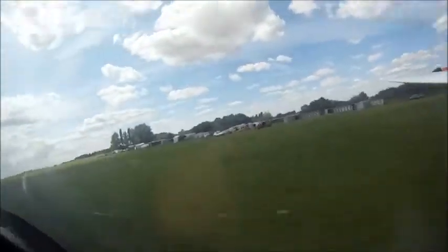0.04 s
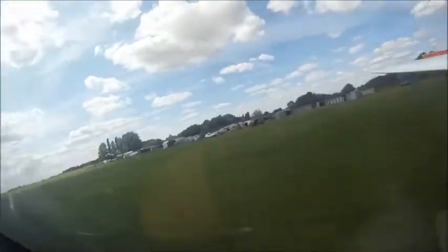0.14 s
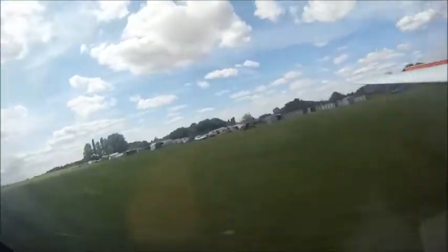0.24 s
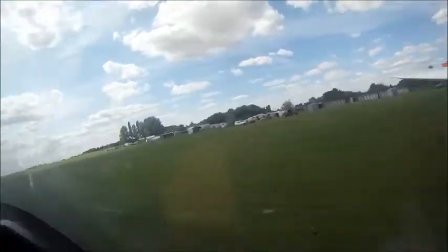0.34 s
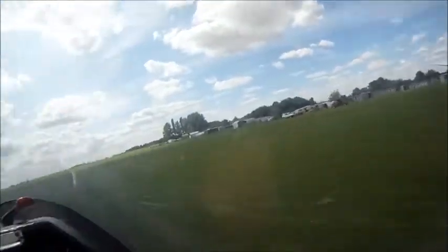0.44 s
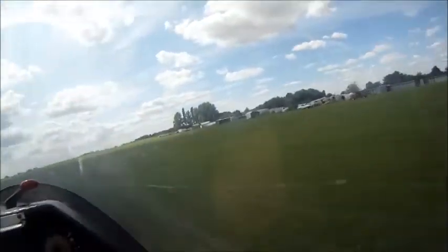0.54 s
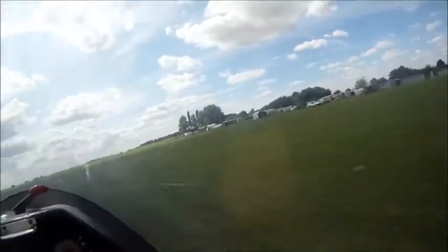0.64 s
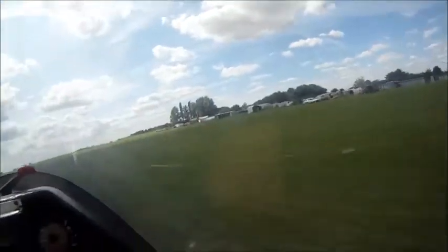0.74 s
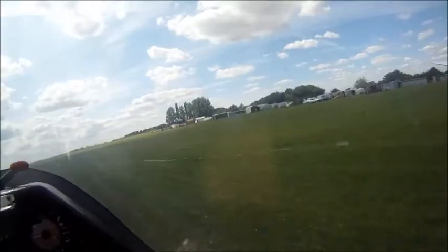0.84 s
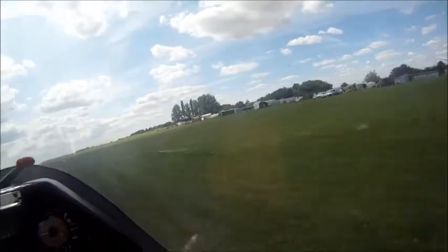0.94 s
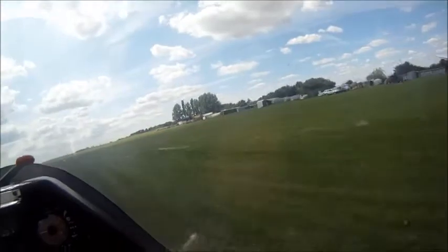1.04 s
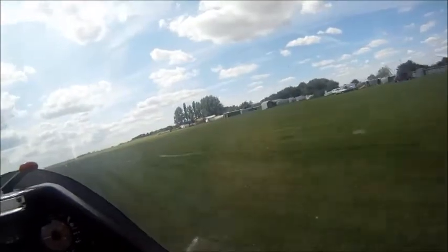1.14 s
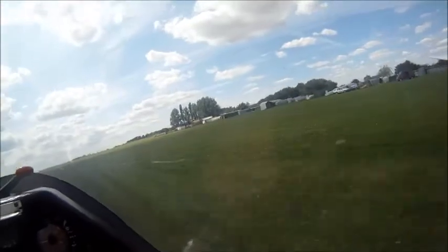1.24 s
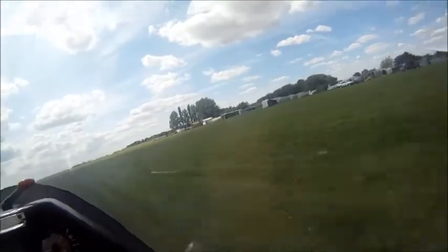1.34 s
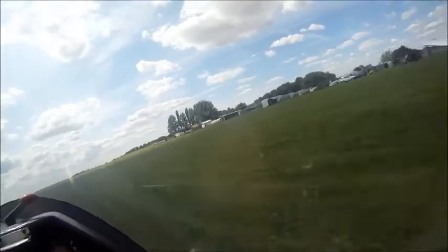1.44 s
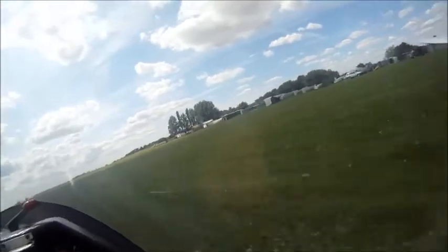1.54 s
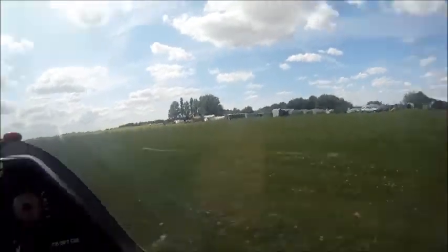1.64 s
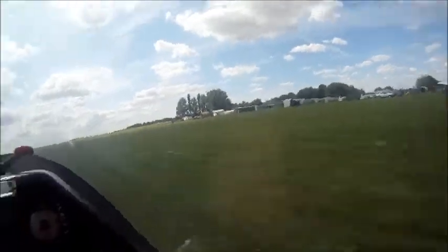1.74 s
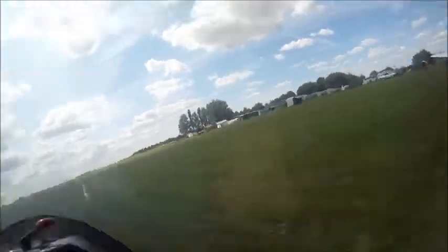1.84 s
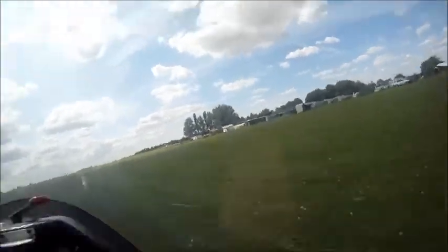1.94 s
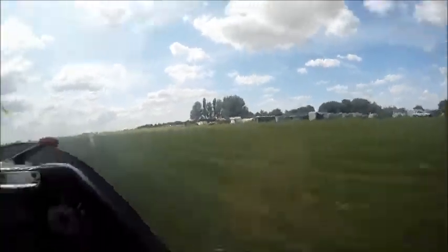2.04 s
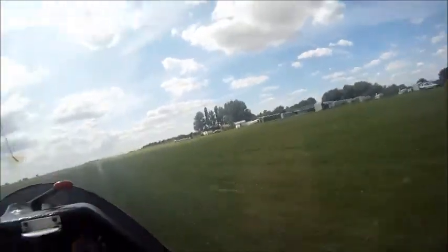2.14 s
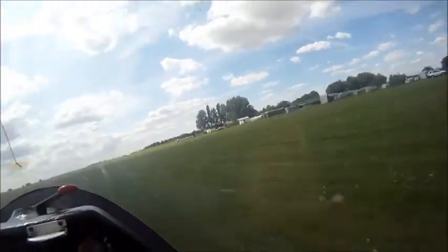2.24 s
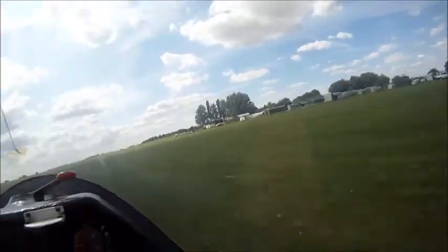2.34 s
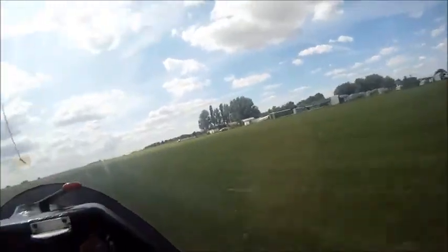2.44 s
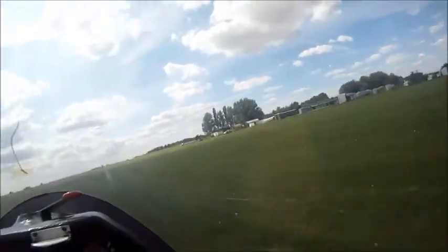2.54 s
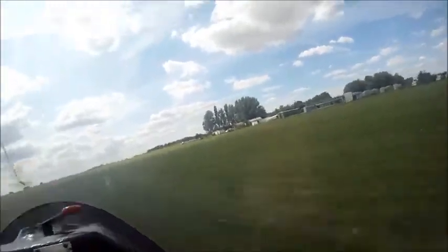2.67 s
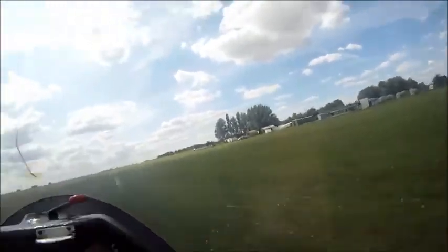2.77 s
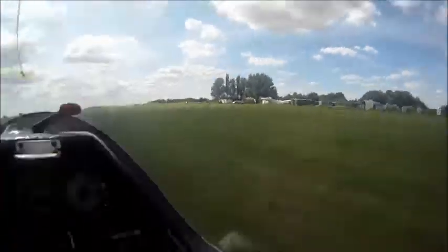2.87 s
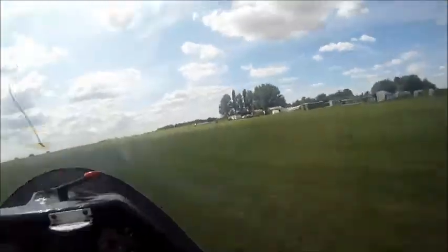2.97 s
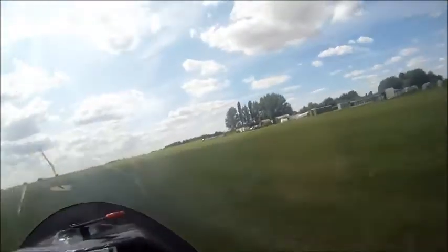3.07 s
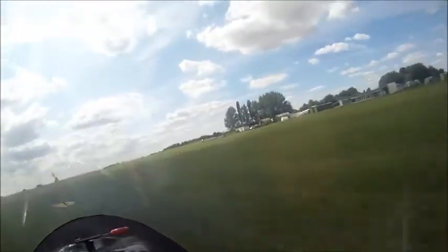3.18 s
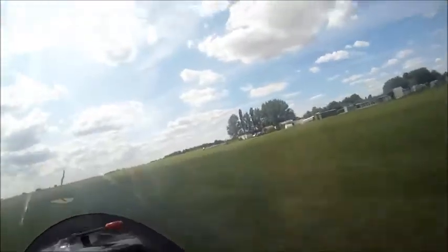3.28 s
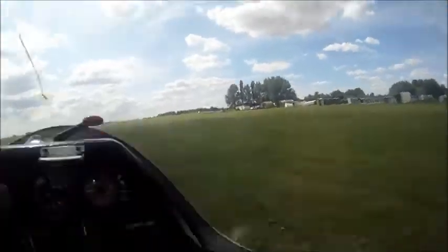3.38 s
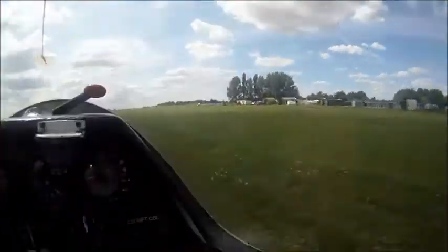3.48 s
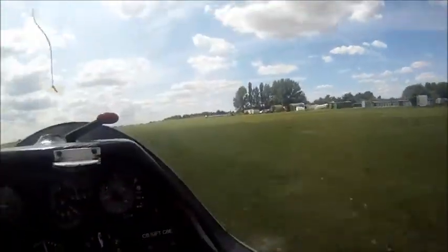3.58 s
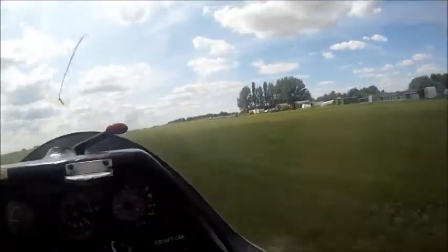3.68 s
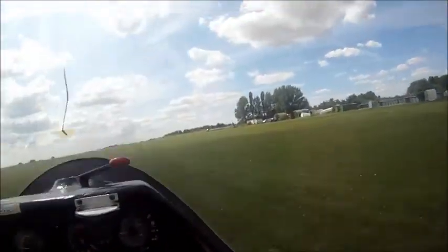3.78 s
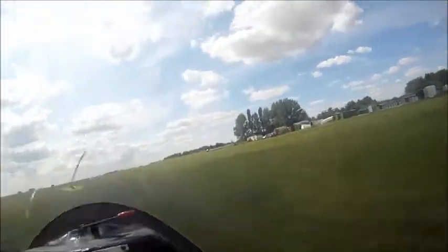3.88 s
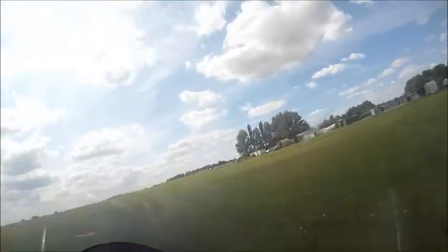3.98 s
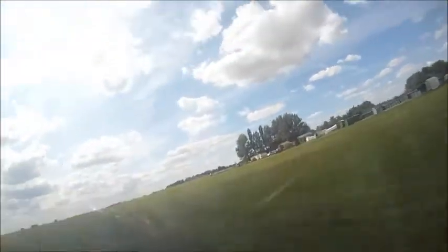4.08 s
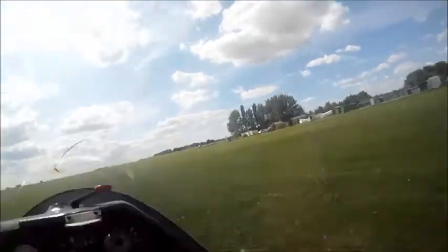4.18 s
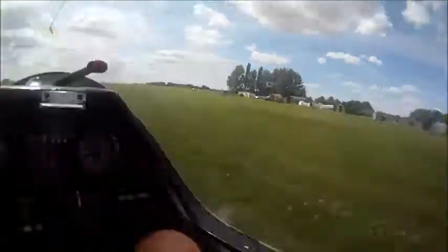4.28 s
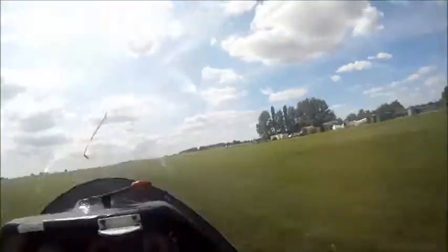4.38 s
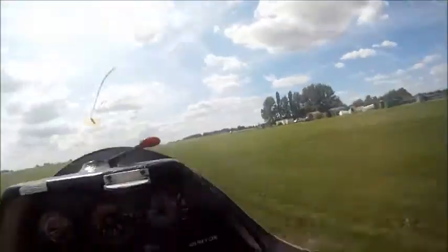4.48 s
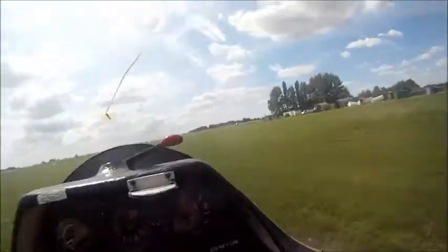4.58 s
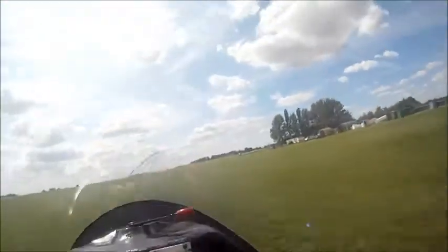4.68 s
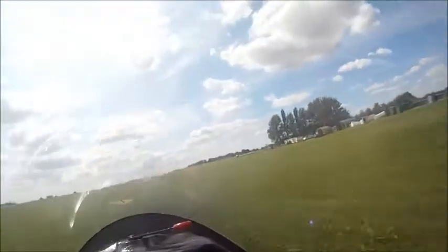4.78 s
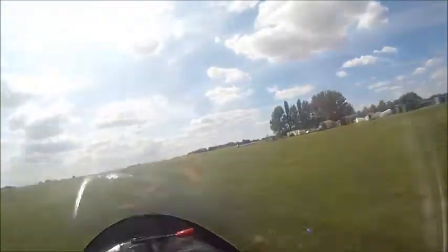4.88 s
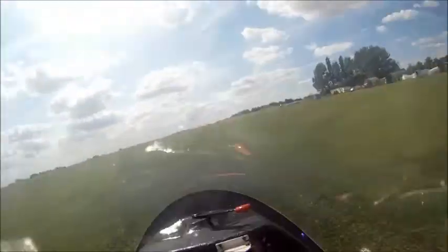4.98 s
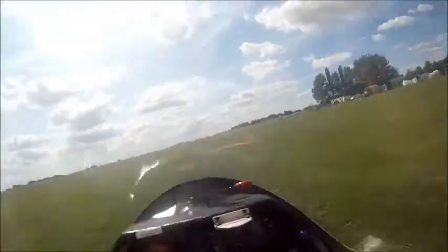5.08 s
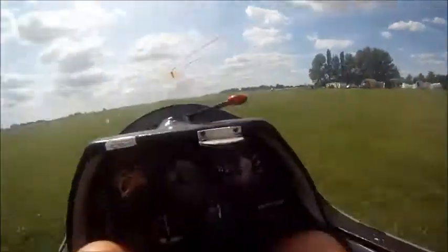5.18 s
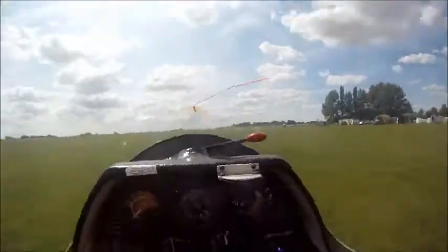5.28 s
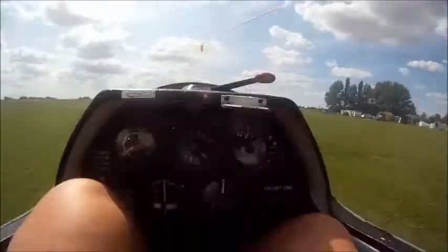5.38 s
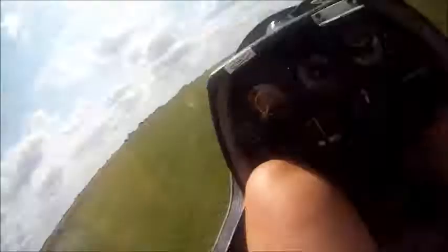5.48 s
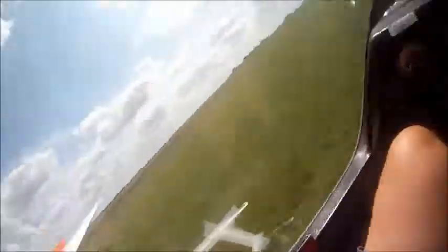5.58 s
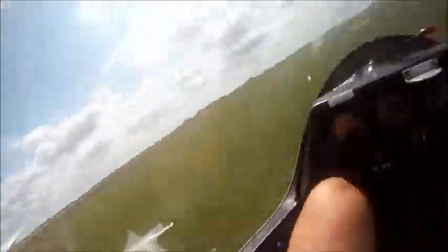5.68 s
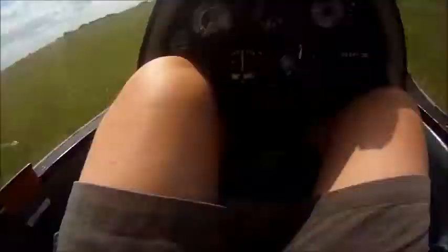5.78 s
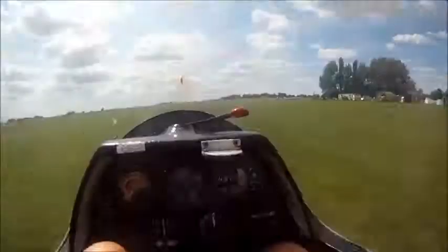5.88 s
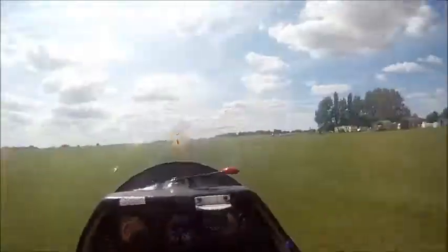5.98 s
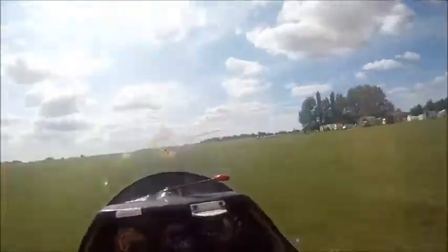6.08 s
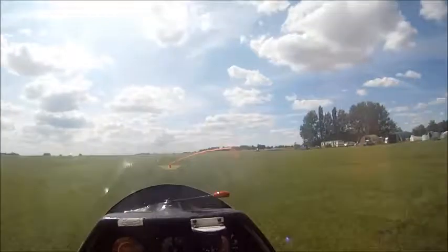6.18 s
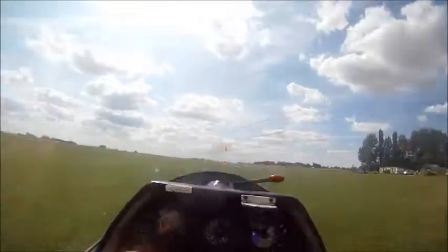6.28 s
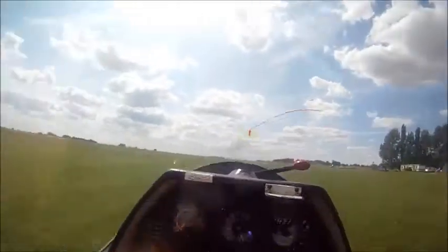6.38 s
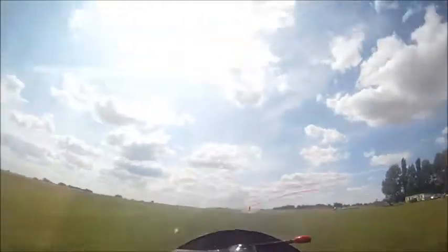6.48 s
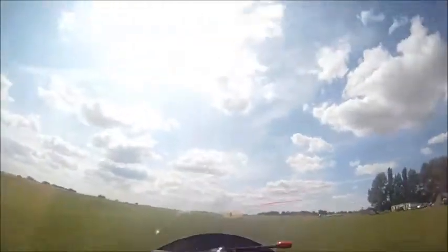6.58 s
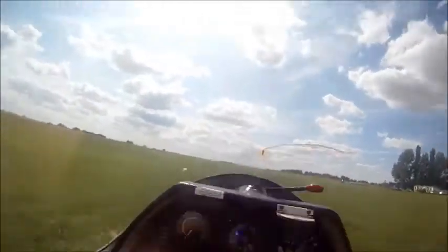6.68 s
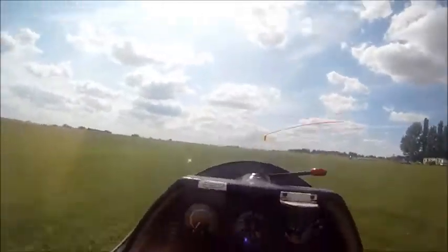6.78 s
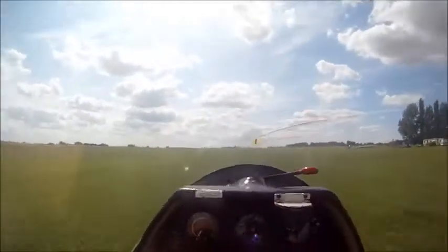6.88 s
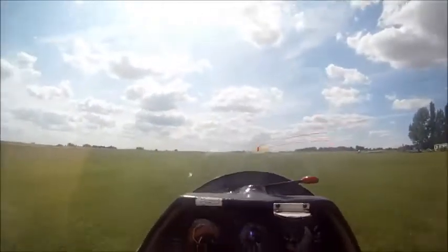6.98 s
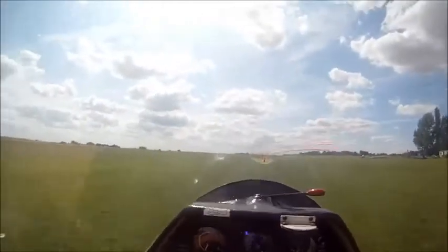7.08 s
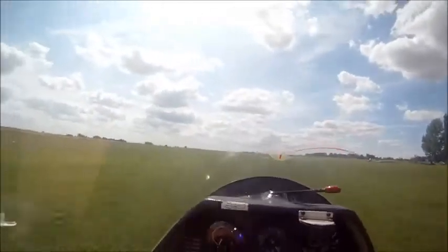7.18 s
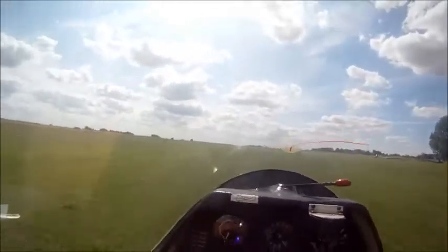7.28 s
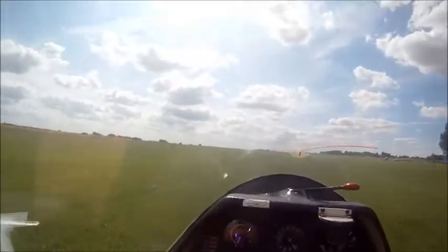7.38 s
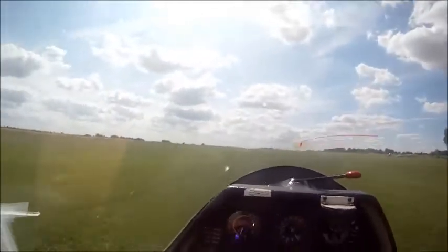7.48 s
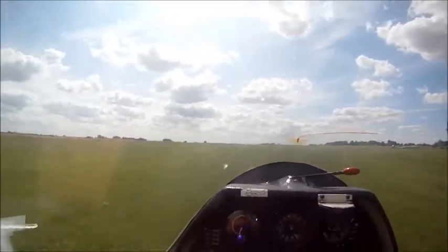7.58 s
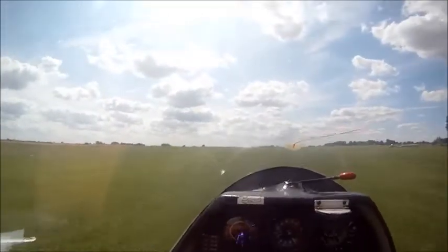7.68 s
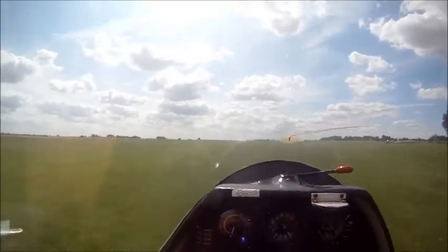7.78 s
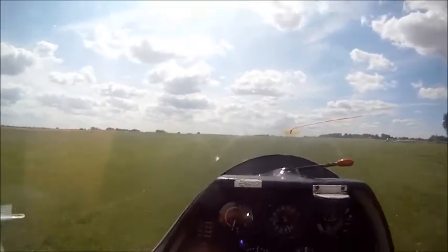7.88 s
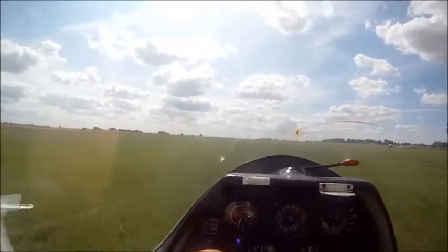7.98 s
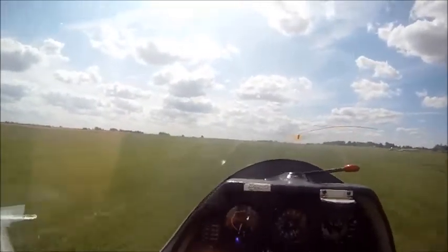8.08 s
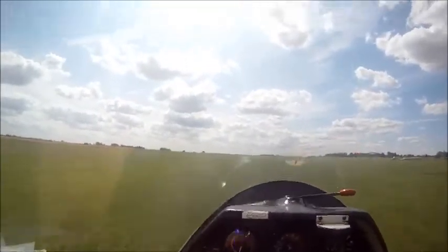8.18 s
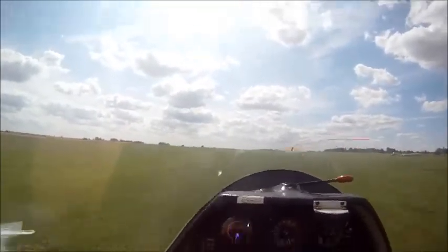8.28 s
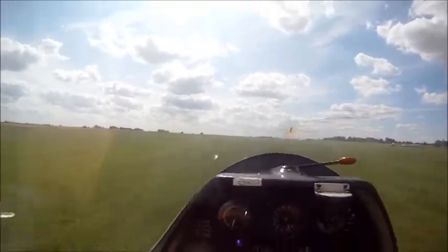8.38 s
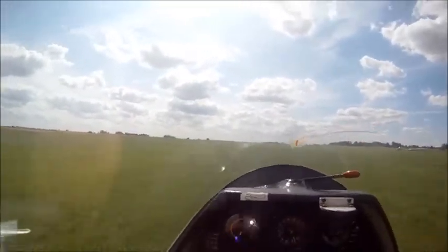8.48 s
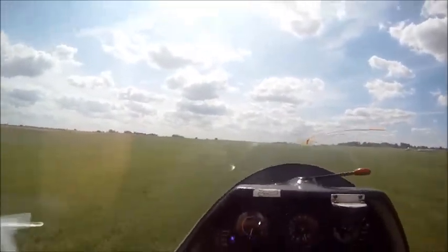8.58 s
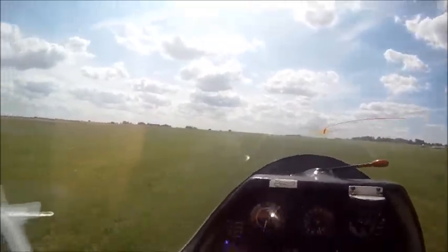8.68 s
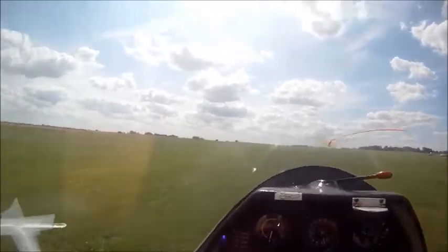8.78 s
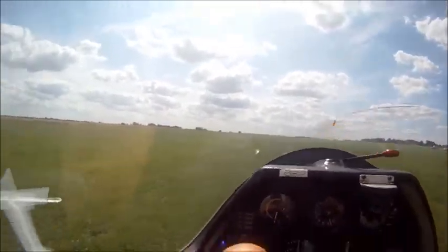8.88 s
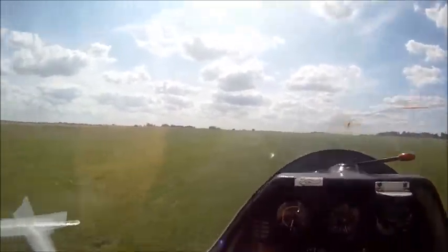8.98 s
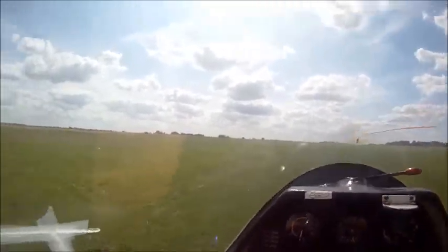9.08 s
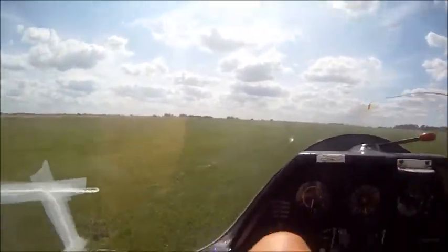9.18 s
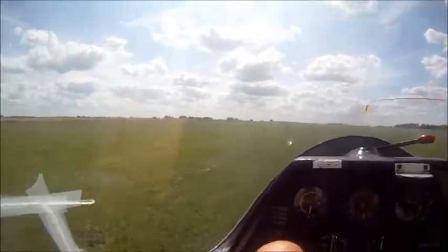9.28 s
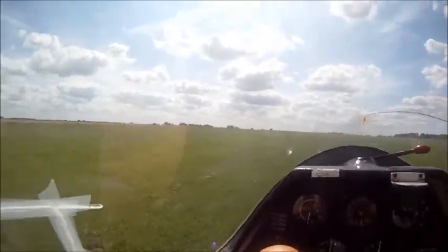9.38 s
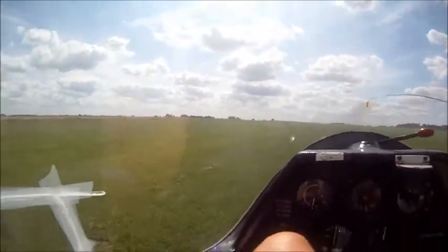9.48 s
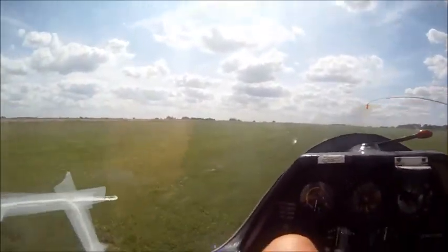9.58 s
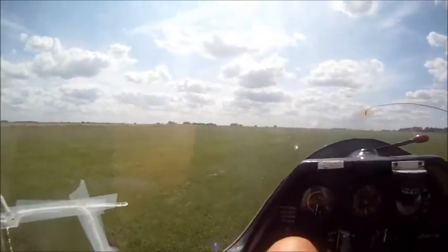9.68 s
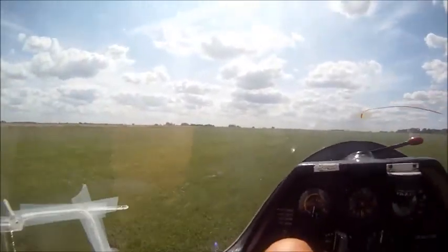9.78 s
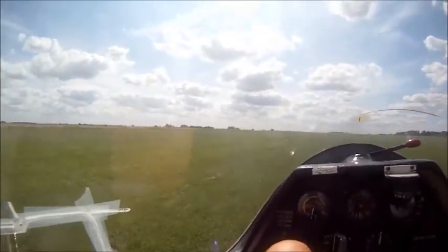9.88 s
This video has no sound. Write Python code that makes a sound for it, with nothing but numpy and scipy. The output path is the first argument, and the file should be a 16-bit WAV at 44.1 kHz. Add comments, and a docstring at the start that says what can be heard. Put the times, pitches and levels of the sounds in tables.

```python
"""A glider lands on a grass strip, heard at a small cased camera in the cockpit: first air rush, hiss and early knocks.
From 1.48 s the wheel rumbles, the fuselage booms and grass brushes the belly, with a short hop just after 5 s.
Throughout, the camera mount knocks, ticks and rattles; the hardest blows clip and briefly pull the gain down.
The air sinks until 8.5 s while ground noise fades and cockpit resonances sing out, then the rush rises again.
Air and grass are filtered noise and impulses; knocks and ticks are short sums of sines."""
import sys
import numpy as np
from scipy import signal
from scipy.fft import rfft, irfft
from scipy.io import wavfile
from scipy.ndimage import uniform_filter1d

SR = 44100
rng = np.random.default_rng(int(sys.argv[2]) if len(sys.argv) > 2 else 0)


def persist_wave(psi):
    """Save psi, clipped to +-1, as 16-bit WAV."""
    counts = np.round(np.clip(psi, -1, 1) * 32767).astype(np.int16)
    wavfile.write(sys.argv[1], SR, np.atleast_2d(counts).T)


N = 437912
TIME_S = np.arange(N) / SR
BLOW_S = TIME_S[:4096]  # time since a single blow
BIN_HZ = np.maximum(np.fft.rfftfreq(N, 1 / SR), 1)

# Table levels are relative; the functions add their own trims.
# airflow along the canopy: time_s, level_db
AIR_LEVEL = [(0, -42), (.5, -41.5), (1.0, -45.5), (1.5, -46), (5, -53.5), (8.5, -66), (9.93, -55.5)]
# level of the cockpit resonances: time_s, level_db
SING_LEVEL = [(0, -63.5), (7.3, -56.5), (8.6, -55.5), (9.2, -63), (9.93, -64.5)]
# ground run from touchdown: time_s, wheel_jolt_db, belly_drag_db
GROUND_LEVELS = [(1.48, -41, -60), (1.6, -29, -38), (2.3, -32, -37), (2.65, -26.5, -37),
                 (3.1, -28.5, -39.5), (3.45, -28, -38.5), (3.7, -32, -44.5), (4.45, -31, -41.5),
                 (4.92, -33.5, -41.5), (5.06, -41, -53), (5.28, -29, -41), (5.85, -26, -33.5),
                 (6.05, -31.5, -40.5), (6.5, -26.5, -34), (6.92, -30.5, -41.5), (7.2, -31, -47.5),
                 (8.3, -38.5, -53), (9.1, -53, -61), (9.93, -57, -57.5)]
# rough patches loading the wheel: middle_s, length_s (scaled in surges), surge_db
ROUGH_PATCHES = [(2.005, 0.41, 7), (2.797, 0.09, 10.5), (3.344, .21, 9), (4.2, 0.22, 10),
                 (5.716, 0.26, 5.5), (8.27, 0.17, 4.5), (9.47, 0.082, 10.5)]
# tall tufts slapping the belly: start_s, level_db
TUFT_SLAPS = [(0.347, -37), (1.894, -30), (2.327, -36), (2.603, -33), (3.036, -34.5), (3.273, -37),
              (6.014, -45), (7.055, -48.5), (7.083, -43), (7.241, -49.5), (7.371, -47.5), (8.223, -41.5),
              (8.612, -51.5), (9.754, -45.5)]
# lightly loaded tyre scuffing once a turn: start_s, end_s (sets the turn count), first_turn_s, level_db
TYRE_SCUFFS = [(3.556, 4.84, .0945, -38.5), (7.96, 8.82, .165, -47)]
# chatter of the mount: middle_s, length_s (scaled in rattles), case_db, shell_db
RATTLE_BURSTS = [(0.251, 0.031, -34, -37.5), (0.309, 0.045, -39.5, -30.5), (1.874, 0.023, -25.5, -48),
                 (2.775, 0.027, -36.5, -26.5), (4.37, 0.036, -25.5, -23.5), (4.443, 0.039, -34, -28),
                 (5.344, 0.081, -28.5, -32), (5.459, 0.051, -28, -28), (5.545, 0.041, -25, -22),
                 (5.687, 0.035, -32, -32), (5.824, 0.032, -21.5, -25), (5.903, 0.024, -32.5, -25.5),
                 (6.079, 0.047, -29.5, -36), (6.228, 0.053, -32.5, -36), (6.315, 0.082, -25, -31),
                 (6.479, 0.055, -28.5, -31.5), (6.537, 0.043, -19.5, -32.5), (6.652, 0.024, -30, -50),
                 (6.955, 0.053, -34, -33), (9.769, 0.034, -44.5, -37)]
# creaking slips of the plastic joint: middle_s, level_db
JOINT_TICKS = [(0.2572, -6.5), (0.7019, -18.5), (0.8486, -20), (2.036, -6), (2.0627, -5), (2.863, 5),
               (3.3614, -7.5), (4.2784, -9.5), (4.3589, -2), (4.5311, -9.5), (4.9645, 1), (4.972, 4.5),
               (4.9865, -8), (5.1915, -12), (5.4659, -8), (5.4813, 15), (5.8393, -4.5), (6.24, 4.5),
               (6.295, -4), (6.4816, 3), (6.542, -3.5), (6.7225, -12), (6.8159, 3.5), (6.8823, 3.5),
               (6.9817, -4), (8.8653, -25), (9.1864, -15), (9.417, -41.5), (9.4343, -33.5)]
# knocks of the mount: start_s, crack_peak_db, thud_db
MOUNT_KNOCKS = [(0.0879, -20, -16), (0.1117, -27, -19), (0.2762, 3, -11), (0.356, -41, -13.5),
                (0.433, -24.5, -20), (0.795, -8, -10), (0.8262, -9.5, -16), (0.9718, -4, -16),
                (1.688, -15.5, -6), (1.8627, 4, -6.5), (2.0342, -4, -15), (2.881, 0, -6.5),
                (2.9603, 11.5, -10), (3.4669, -4, -21.5), (4.2769, 9.5, -3), (4.358, 10.5, -14),
                (4.9648, 17, 6), (4.9703, 8, 1.5), (5.2599, -13, -30), (5.4336, -4, -11), (5.4655, 0, -10),
                (5.4791, 18.5, -5), (5.8327, -7, -3.5), (6.201, -10.5, -25), (6.457, -24.5, -6.5),
                (6.7451, -3, -11), (6.753, -10, -8.5), (6.7723, -14.5, -26), (7.0127, -7.5, -19)]
# ringing of a knock: centre_hz, t60_s, level_db
KNOCK_RING = [(210, 0.0092, -4), (520, 0.0035, 0.5), (918, 0.016, -13), (1200, 0.0092, -4),
              (1980, 0.012, -10), (2340, 0.026, -17), (3590, 0.012, -19.5), (8350, .003, -18),
              (10240, 0.0028, -9), (12500, 0.0031, -19)]
# Resonances below: pitch_hz, half_width_hz (to -6 dB), level_db
# plastic case; ticks replace the first pitch
CASE_RING = [(2146, 330, 1), (3160, 330, -12), (3650, 160, -14), (4550, 920, -25.5), (7500, 790, -36),
             (8480, 740, -19), (9720, 210, -10.5), (14400, 320, -15), (14300, 460, -30.5)]
# shell panels under chatter: pitch_hz, half_width_hz, level_db
PANEL_RING = [(613, 290, -3.5), (1130, 280, 1)]
# paths of outside hiss into the case: pitch_hz, half_width_hz, level_db
HISS_PATHS = [(2176, 328, 1), (3070, 350, -6), (3660, 414, -7), (5027, 300, -11.5), (6960, 290, -14),
              (8220, 340, -13.5), (8900, 300, -12.5), (9810, 280, -11.5), (10740, 350, -16),
              (11550, 400, -30.5), (13200, 500, -16), (14200, 450, -15.5), (15100, 510, -20)]
# narrow cockpit resonances: pitch_hz, half_width_hz, level_db
COCKPIT_RING = [(470, 120, -2.5), (1206, 26, -1)]
# spectrum of the air rush: pitch_hz, density_db
AIR_SPECTRUM = [(20, -3.5), (70, -4), (100, -6), (140, -5), (230, -14.5), (300, -23), (370, -17),
                (560, -25), (800, -23.5), (1020, -20.5), (1250, -20.5), (1550, -33), (4000, -47.5)]
# spectrum of the tyre's thumps: pitch_hz, density_db
RUMBLE_SPECTRUM = [(10, -11.5), (22, -4), (38, -0.5), (70, -5), (105, -14.5), (170, -24), (400, -61.5)]
# spectrum of the fuselage boom: pitch_hz, density_db
BOOM_SPECTRUM = [(60, -49), (105, -6), (125, -2.5), (142, 1.5), (172, -8), (225, -11), (300, -20.5),
                 (600, -54)]
# spectrum of the fuselage shell: pitch_hz, density_db
SHELL_SPECTRUM = [(150, -24.5), (290, -1.5), (470, -1.5), (640, -2), (810, -10), (980, 0.5), (1110, -5.5),
                  (1240, -0.5), (1550, -16.5), (2200, -19), (4000, -44)]


def undb(db):
    """Decibels to gain."""
    return 10 ** (np.asarray(db) / 20)


def unit(x):
    """Scale to rms 1."""
    return x / np.sqrt(np.mean(x ** 2))


def curves(table):
    """Join each column after time_s by straight lines."""
    time_s, *columns = np.transpose(table)
    return [np.interp(TIME_S, time_s, column) for column in columns]


def add(track, start_s, sound):
    """Mix a sound into the track in place."""
    i = max(int(start_s * SR), 0)
    track[i:i + len(sound)] += sound[:N - i]


def shape(x, gain):
    """Minimum-phase filter with this gain per bin: blows start sharply and ring out; rms 1."""
    cepstrum = irfft(np.log(gain), N)
    # fold onto positive time
    cepstrum[1:N // 2] *= 2
    cepstrum[N // 2 + 1:] = 0
    response = np.exp(rfft(cepstrum))
    return unit(irfft(rfft(x) * response, N))


def colour(x, spectrum):
    """Filter x by a spectrum joined on a log frequency axis; rms 1."""
    hz, db = np.transpose(spectrum)
    return shape(x, undb(np.interp(np.log(BIN_HZ), np.log(hz), db)))


def resonate(x, modes):
    """Filter x through steep resonances whose powers add; rms 1."""
    power = sum(undb(db) ** 2 / (1 + ((BIN_HZ - hz) / half_width_hz) ** 2) ** 2
                for hz, half_width_hz, db in modes)
    return shape(x, np.sqrt(power))


def walk(rate_hz):
    """Smooth random drift, changing about rate_hz times a second; rms 1."""
    hold = int(SR / rate_hz)
    steps = np.repeat(rng.standard_normal(N // hold + 1), hold)[:N]
    return unit(uniform_filter1d(steps, hold))


def impacts(rate_hz, scatter_db):
    """Tiny blows at random moments, of uneven size and either sign; rms 1."""
    struck = rng.random(N) < rate_hz / SR
    size_db = scatter_db * np.clip(rng.standard_normal(N), -2, 2)
    sign = rng.choice([-1, 1], N)
    return unit(struck * sign * undb(size_db))


def hiss(x):
    """Pass x into the camera's case as hiss."""
    return resonate(x, HISS_PATHS)


def canopy(x, count=10, reach_s=.022, echo_db=-15):
    """Close reflections of either sign from canopy and panel make x slightly hollow; rms 1."""
    delays = (SR * reach_s * rng.uniform(.1, 1, count)).astype(int)
    echoes = sum(rng.choice([-1, 1]) * np.pad(x, (d, 0))[:N] for d in delays)
    return unit(x + undb(echo_db) * echoes)


def air(hiss_db=-9, gust_hz=17, gust_db=.7):
    """Gusting rush and hiss along the canopy, over noise in the cockpit's narrow resonances."""
    level_db, = curves(AIR_LEVEL)
    sing_db, = curves(SING_LEVEL)
    rush = colour(rng.standard_normal(N), AIR_SPECTRUM)
    rush = rush + undb(hiss_db) * canopy(hiss(rng.standard_normal(N)))
    sing = resonate(rng.standard_normal(N), COCKPIT_RING)
    return rush * undb(level_db + gust_db * walk(gust_hz)) + sing * undb(sing_db)


def tufts(rise_s=0.0016, fade_s=0.013, tuft_db=6.5, shell_db=-6):
    """A taller tuft slaps the belly and drags off it: enveloped bursts of dense impacts."""
    strength = np.zeros(N)
    slap = (1 - np.exp(-BLOW_S / rise_s)) * np.exp(-BLOW_S / fade_s)
    for start_s, level_db in TUFT_SLAPS:
        add(strength, start_s, undb(level_db + tuft_db) * slap)
    stalks = impacts(5000, 2.3)
    return strength * (hiss(stalks) + undb(shell_db) * colour(stalks, SHELL_SPECTRUM))


def scuffs(rise_s=0.0022, fade_s=.016, scuff_db=4.5, vary_db=2.5, stretch_per_turn=.003):
    """Once a turn the tyre catches the turf; each turn takes a little longer than the last."""
    strength = np.zeros(N)
    catch = (1 - np.exp(-BLOW_S / rise_s)) * np.exp(-BLOW_S / fade_s)
    for start_s, end_s, turn_s, level_db in TYRE_SCUFFS:
        for turn in np.arange((end_s - start_s) / turn_s):
            size_db = level_db + scuff_db + vary_db * rng.standard_normal()
            catch_s = start_s + turn * turn_s * (1 + stretch_per_turn * turn)
            add(strength, catch_s, undb(size_db) * catch)
    grass = hiss(impacts(2500, 1.7))
    shell = colour(impacts(1500, 1.2), SHELL_SPECTRUM)
    return strength * (grass + shell)


def surges():
    """Extra load in dB as the wheel rides into and out of each rough patch."""
    surge_db = np.zeros(N)
    for middle_s, length_s, peak_db in ROUGH_PATCHES:
        position = np.clip((TIME_S - middle_s) / (1.54 * length_s), -.5, .5)
        surge_db += peak_db * np.cos(np.pi * position) ** 2
    return surge_db


def bumps(rate_hz, fade_s, scatter_db, steady):
    """Belly contact strength: every clod starts a surge that dies away; rms 1."""
    size_db = scatter_db * np.clip(rng.standard_normal(N), -1.5, 1.5)
    clods = (rng.random(N) < rate_hz / SR) * undb(size_db)
    surge = signal.lfilter([1], [1, -np.exp(-1 / (fade_s * SR))], clods)
    return unit(np.sqrt(steady + surge / surge.mean()))


def ground_run(boom_db=0.5, grass_db=-4.5, boom_fade_db_per_s=0.95, drag_share=0.56, uneven_db=1.86):
    """Wheel rumbles and fuselage booms over rough ground; clods make shell and belly grass surge together."""
    jolt_db, drag_db = curves(GROUND_LEVELS)
    surge_db = surges()
    rolled_s = TIME_S - GROUND_LEVELS[0][0]
    rumble_level_db = jolt_db + uneven_db * walk(9)
    # slower bumps reach the boom less
    boom_level_db = jolt_db + surge_db - boom_fade_db_per_s * rolled_s + boom_db
    brush_db = drag_db + drag_share * surge_db
    on_ground = np.clip(rolled_s / 0.081, 0, 1)
    contact = bumps(rate_hz=45, fade_s=0.012, scatter_db=4.5, steady=0.39)
    wheel = colour(impacts(400, 1.4), RUMBLE_SPECTRUM) * undb(rumble_level_db)
    fuselage = colour(impacts(300, 1.1), BOOM_SPECTRUM) * undb(boom_level_db)
    skin = canopy(colour(impacts(800, 2.8), SHELL_SPECTRUM)) * contact * undb(brush_db)
    blades = canopy(hiss(impacts(1700, 3.3))) * contact * undb(brush_db + grass_db)
    return on_ground * (wheel + fuselage + skin + blades)


def rattles(plastic_db=-3, scrape_db=-2, panel_db=-1):
    """The mount chatters: bursts of dense tiny blows ring the case and the shell."""
    case_strength, shell_strength = np.zeros((2, N))
    for middle_s, length_s, case_db, shell_db in RATTLE_BURSTS:
        swell = np.sqrt(np.hanning(int(1.366 * length_s * SR)))
        start_s = middle_s - len(swell) / 2 / SR
        add(case_strength, start_s, undb(case_db) * swell)
        add(shell_strength, start_s, undb(shell_db) * swell)
    chatter = impacts(900, 4.6)
    plastic = undb(plastic_db) * resonate(chatter, CASE_RING)
    scrape = undb(scrape_db) * hiss(impacts(2500, 6.5))
    panel = undb(panel_db) * resonate(chatter, PANEL_RING)
    return case_strength * (plastic + scrape) + shell_strength * panel


def ticks(hold_s=0.0021, rise_s=0.000083, stop_s=0.00038, tail_s=0.0024, tail_db=-14,
          grit_db=-20, tick_db=-3.5, vary_db=2, pitch_at_0_db_hz=2228, pitch_rise_hz_per_db=4.5):
    """The joint slips for two milliseconds: case modes start at once, hold and ring out, with some grit."""
    out = np.zeros(N)
    hz, _, db = np.transpose(CASE_RING)[:, :, None]
    t = BLOW_S[:512] - BLOW_S[128]  # zero at mid-slip
    start = 1 / (1 + np.exp(-(t + hold_s / 2) / rise_s))
    hold = 1 / (1 + np.exp((t - hold_s / 2) / stop_s))
    slip = start * (hold + undb(tail_db) * np.exp(-np.abs(t) / tail_s))
    for middle_s, level_db in JOINT_TICKS:
        # a harder slip grips tighter: the first mode rises
        pitch_hz = pitch_at_0_db_hz + pitch_rise_hz_per_db * level_db
        phase_turns = rng.random((len(hz), 1))
        mode_hz = np.vstack([[pitch_hz], hz[1:]])
        # upper modes are struck unevenly
        upper_db = db[1:] + vary_db * rng.standard_normal((len(hz) - 1, 1))
        mode_db = np.vstack([db[:1], upper_db])
        ring = (undb(mode_db) * np.sin(2 * np.pi * (mode_hz * t + phase_turns))).sum(axis=0)
        grit = signal.lfilter([.5], [1, -.75], rng.standard_normal(len(t)))
        add(out, middle_s + t[0], undb(level_db + tick_db) * slip * (ring + undb(grit_db) * grit))
    return out


def knocks(thud_hz=46, thud_t60_s=0.057, tail_db=-22, tail_t60_s=0.058, detune_share=0.12, vary_db=2):
    """Each knock cracks in the mount, rings on in the shell and swings the camera on its arm as a low thud."""
    out, tail = np.zeros((2, N))
    hz, t60_s, db = np.transpose(KNOCK_RING)[:, :, None]
    for start_s, crack_peak_db, thud_db in MOUNT_KNOCKS:
        detune, weight = rng.standard_normal((2, len(hz), 1))
        mode_hz = hz * (1 + detune_share * detune)
        decay = undb(db + vary_db * weight - 60 * BLOW_S / t60_s)
        crack = (decay * np.sin(2 * np.pi * mode_hz * BLOW_S)).sum(axis=0)
        crack = undb(crack_peak_db) * crack / np.abs(crack).max()
        swing_hz = thud_hz * rng.uniform(0.48, 2.2)
        thud = undb(thud_db - 60 * BLOW_S / thud_t60_s) * np.sin(2 * np.pi * swing_hz * BLOW_S)
        add(out, start_s, crack - thud)
        # the mount passes only so much of a hard blow to the shell
        add(tail, start_s, undb(min(crack_peak_db, -2) + tail_db - 60 * BLOW_S / tail_t60_s))
    return out + tail * colour(rng.standard_normal(N), SHELL_SPECTRUM)


def scene():
    """One microphone in a small cockpit: both channels alike."""
    cockpit = air() + tufts() + scuffs() + ground_run() + rattles() + ticks() + knocks()
    return np.array([cockpit, cockpit])


def duck(x, overload_release_db_per_s=130, attack_s=0.019, depth_db_per_db=0.53):
    """Gain control: an overload turns the gain down, too late for the blow itself, and it creeps back."""
    over_db = 20 * np.log10(np.maximum(np.abs(x).max(axis=0), 1))
    release_db = overload_release_db_per_s * TIME_S
    held_db = np.maximum.accumulate(over_db + release_db) - release_db
    pole = np.exp(-1 / (attack_s * SR))
    smooth_db = signal.lfilter([1 - pole], [1, -pole], held_db)
    return x * undb(-depth_db_per_db * smooth_db)


def record(dry, top_hz=15350):
    """The camera ducks after the hardest blows, clips them and cuts everything above top_hz."""
    clipped = np.clip(duck(dry), -1, 1)
    low_pass = signal.ellip(10, .2, 70, top_hz, fs=SR, output="sos")  # ripple, stopband in dB
    return signal.sosfilt(low_pass, clipped)


dry = scene()
out = record(dry)
persist_wave(out)
```